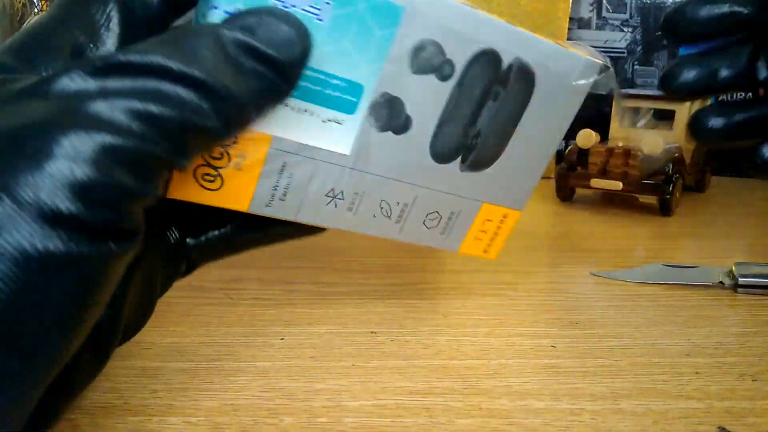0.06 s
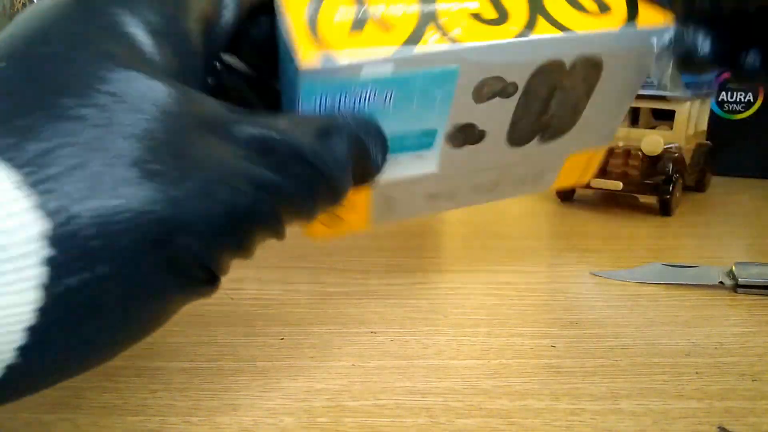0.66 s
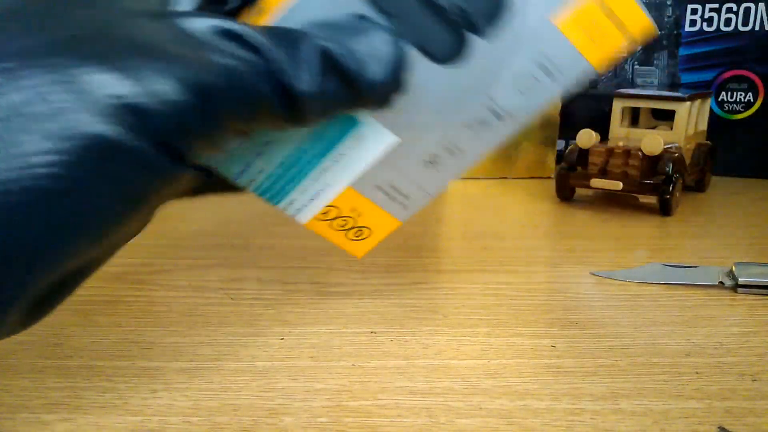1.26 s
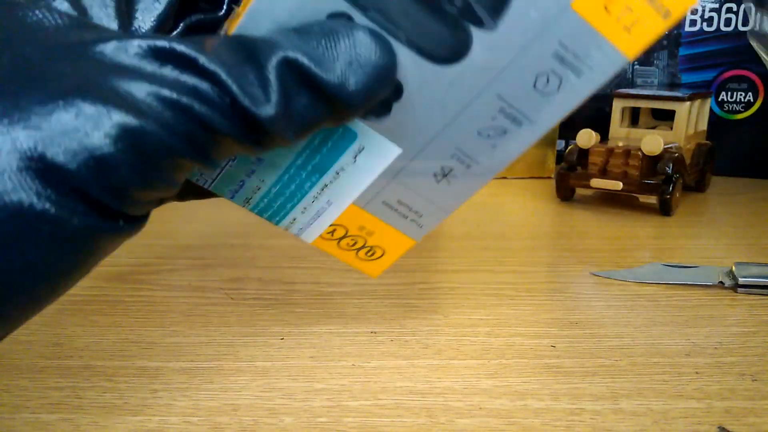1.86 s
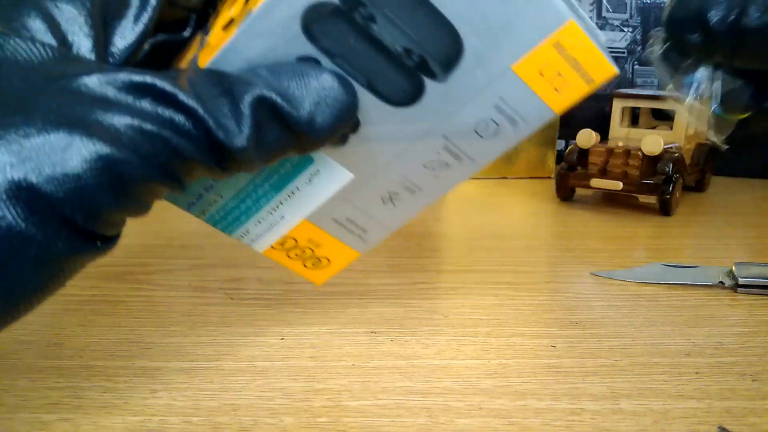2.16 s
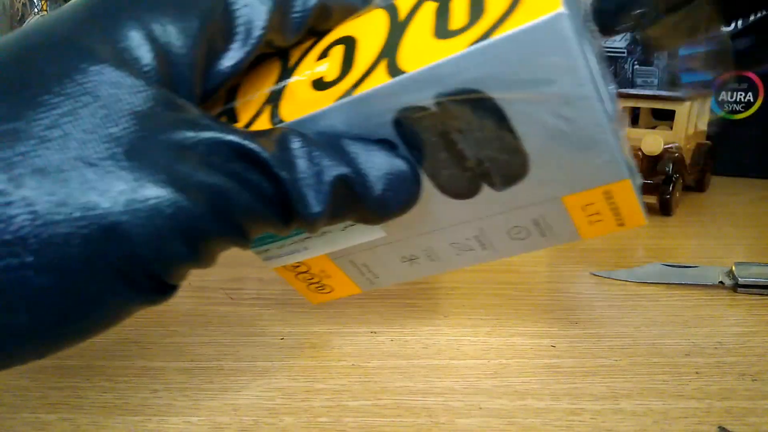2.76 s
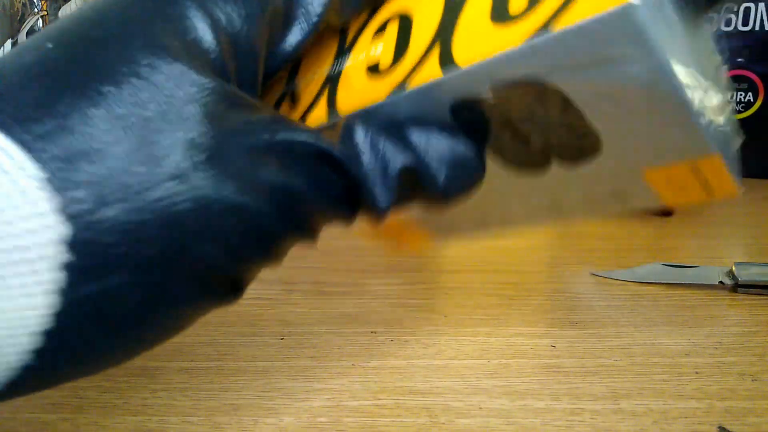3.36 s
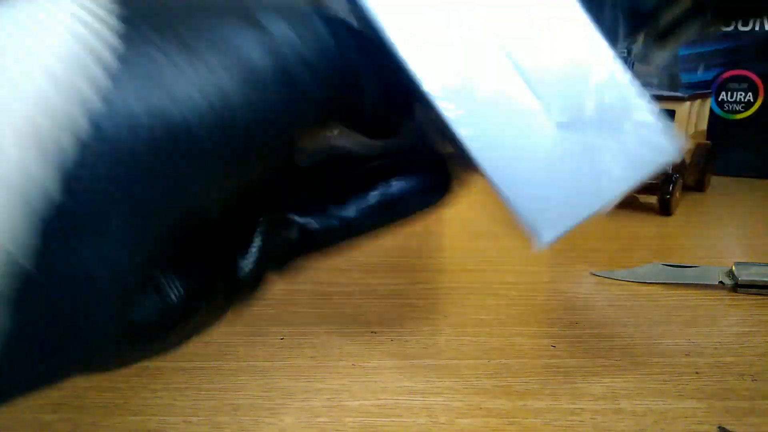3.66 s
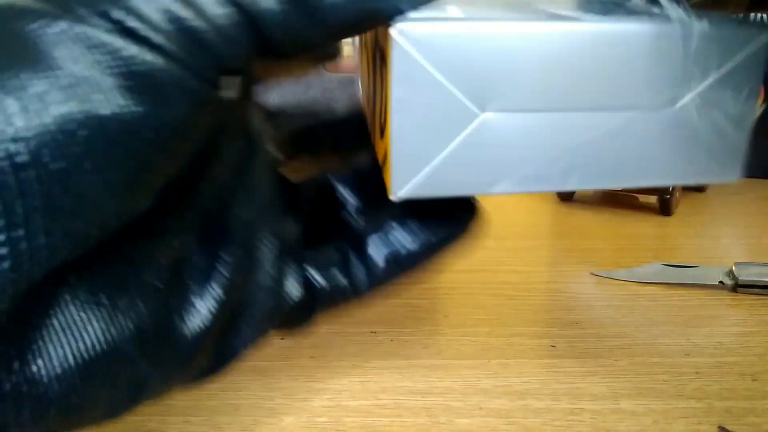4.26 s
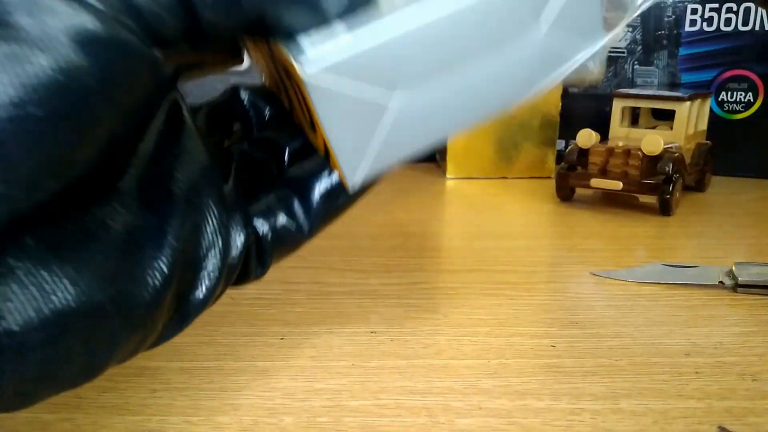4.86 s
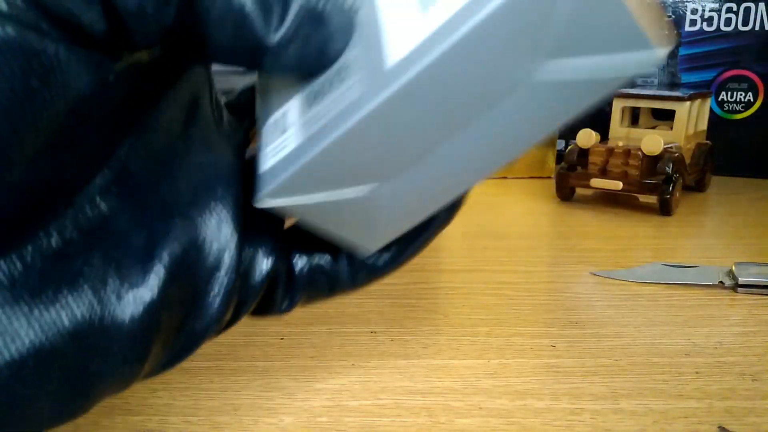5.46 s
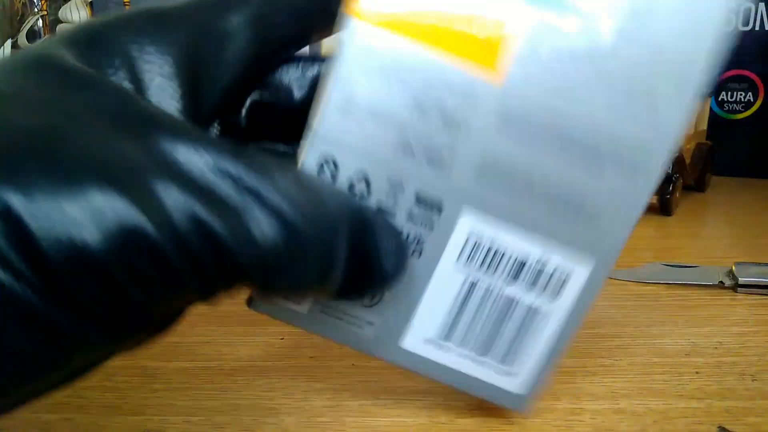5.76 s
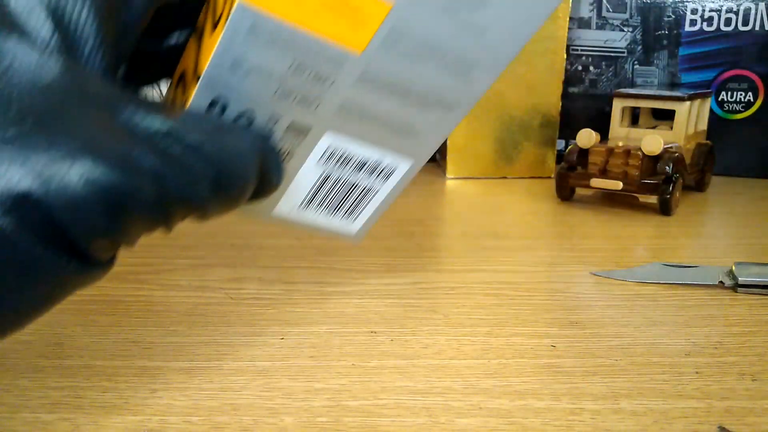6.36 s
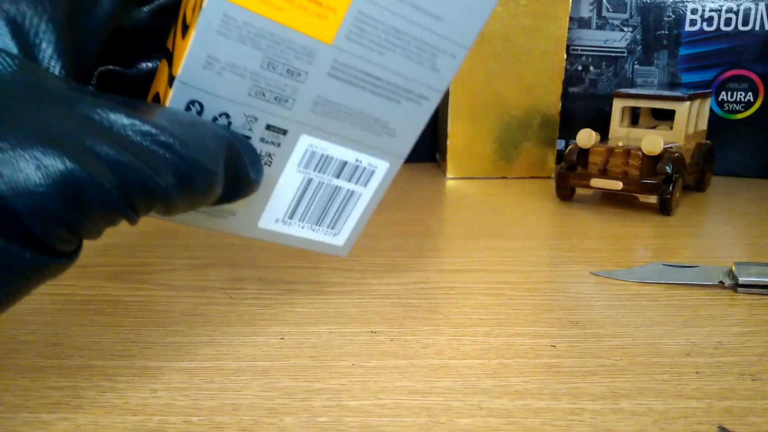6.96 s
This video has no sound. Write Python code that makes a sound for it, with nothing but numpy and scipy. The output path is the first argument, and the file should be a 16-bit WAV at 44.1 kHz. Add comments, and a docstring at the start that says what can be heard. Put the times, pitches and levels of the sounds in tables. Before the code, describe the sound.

Thin plastic film crackles and snaps close up as gloved fingers rub and knock on a small hollow cardboard box.

```python
"""Unwrapping a small cardboard box

Close up, gloved hands turn a small box over a desk and pull off its plastic film. The film crinkles and
snaps as its creases flip. Fingers rub, knock and judder on the card and set the hollow box ringing, and
a rubber fingertip sticks and slips in one rising squeak. A steady electrical hum fills the small room."""
import sys
import numpy as np
from scipy import signal
from scipy.fft import rfft, irfft, next_fast_len
from scipy.io import wavfile

SR = 44100
rng = np.random.default_rng(int(sys.argv[2]) if len(sys.argv) > 2 else 0)


def pcm_store(signal):
    """Save signal as 16-bit PCM."""
    levels = np.round(np.clip(np.atleast_2d(signal), -1, 1) * 32767)
    wavfile.write(sys.argv[1], SR, levels.astype(np.int16).T)


N = 313551
TIME = np.arange(N) / SR

# the bright edge of a crack in the film: freq_hz, gain_db
CRACK_TONE = [(200, -46.5), (1500, -31.5), (3500, -10), (5500, -7.5), (7800, -3), (9500, -3), (12000, -12),
              (16000, -11.5)]
# the midrange body of a crack or a scuff: freq_hz, gain_db
BODY_TONE = [(80, -13.5), (250, -4.5), (900, -2.5), (1600, 0), (3000, 7.5), (5000, 2.5), (9000, -22)]


def film_snaps(flutter_s=.0025, desk_echo_s=.0025, large_db=-14, octaves_per_db=0.1662, size=2048):
    """A crease flips at once, the film flutters for a moment, and the desk returns the crack."""
    # the film buckles: start_s, level_db, body_db (midrange against treble), left_over_right_db
    buckles = [(0.432, -50, -10, -9), (0.5168, -19.5, -17, 2), (0.528, -35, -10, 2), (0.5621, -48, -29, -4),
               (0.6312, -18.5, -17, -1), (0.7902, -11.5, -14.5, -0.5), (0.8237, -7, -17, -1.5),
               (0.9742, -27, -25.5, -2), (1.1708, -28, -38, 2), (1.207, -24, -34, -4),
               (1.255, -19.5, -13.5, -1), (1.373, -25, -17.5, -2), (1.473, -40, -2, 3),
               (1.5238, -11, -12.5, -8), (1.867, -64, 3, -3.5), (2.096, -68, 7.5, 0.5),
               (2.272, -22, -15, 2), (3.4087, -14.5, -24, -1.5), (3.63, -21, -22, -5), (3.644, -25, -16, 0),
               (3.723, -18, -9.5, -2), (3.953, -24.5, -29, -4), (4.1938, -42, -17.5, -6),
               (4.631, -31, -43, -1), (4.646, -23.5, -35, -8.5), (4.704, -26, -23, -4),
               (4.7141, -19.5, -30, -2), (4.7476, -15.5, -21.5, 0), (4.799, -22, -33, 2),
               (4.8593, -22.5, -24.5, -1), (4.9721, -16.5, -14.5, 0.5), (5.1098, -23, -39, 1),
               (5.1394, -14, -15.5, 1.5), (5.1672, -22, -17.5, 4.5), (5.2853, -25, -18, 7),
               (5.2964, -18.5, -12, 3), (5.3073, -14.5, -13, -3), (5.582, -20.5, -21.5, 5),
               (5.6364, -30, -26, 4), (6.171, -23, -11, -1), (6.2013, -23, -12, 0), (6.2505, -23, -17, 1),
               (6.3545, -40, -39, -7), (6.6334, -33, -36.5, 9.5), (6.775, -57.5, -32, 8.5)]
    out, t = np.zeros((2, N)), np.arange(size) / SR
    for start_s, level_db, body_db, side_db in buckles:
        flutter = rng.standard_normal((2, size)) * np.exp(-t / flutter_s)
        flip = gain_of(-1) * spaced_pair(flutter) / np.linalg.norm(flutter[0])
        flip[0, 0] += 1
        flip[1, 1] += 1  # the click reaches the right side one sample later
        add(flip, desk_echo_s, gain_of(-8) * flip)
        octaves_up = octaves_per_db * max(large_db - level_db, 0)  # small creases sound higher
        edge = coloured(flip, np.array(CRACK_TONE) * [2 ** octaves_up, 1])
        crack = gain_of(11) * edge + gain_of(body_db + 16) * coloured(flip, BODY_TONE)
        add(out, start_s + .001, panned(gain_of(level_db) * crack, side_db))
    return out


def handling():
    """Crinkling film, rubbed card and the hollow of the box all follow the hands."""
    # the dry rasp of rubbed card: freq_hz, gain_db
    card_tone = [(150, -29), (400, -15.5), (630, 2.5), (880, -5), (1150, -3.5), (1500, -7), (2100, -3.5),
                 (3000, -10), (5000, -13), (12000, -53.5)]
    # the low voice of the hollow box: freq_hz, gain_db
    hollow_tone = [(40, -32), (110, -5.5), (180, -4.5), (280, 3), (420, -1), (700, -24), (2000, -56.5)]
    film_db, card_db, hollow_db = stroke_levels()
    # the glove catches and lets go in coarse grains, and drags in fine ones
    catch = spaced_pair(grains(per_s=400, spread_db=4.5, clump_db=1.5, clumps_per_s=55))
    drag = spaced_pair(grains(per_s=1400, spread_db=1.5, clump_db=4.0, clumps_per_s=70))
    crackle = gain_of(-11.5) * coloured(gain_of(film_db) * catch, CRACK_TONE)
    film = crinkling(film_db) + crackle + small_snaps(film_db)
    rub = gain_of(card_db) * (0.78 * drag + 0.49 * catch)
    ring = gain_of(-18.5) * signal.oaconvolve(rub, box_ring()[None], axes=1)[:, :N]
    hollow = gain_of(-2.5) * coloured(gain_of(hollow_db) * drag, hollow_tone)
    return follow_box(film + coloured(rub, card_tone) + ring + hollow)


def stroke_levels(swell_share=0.33, sag_db_per_s=15, rest_db=-97, hop=44):
    """Film, card and hollow levels in dB: each stroke swells, sags as the glove slides, then dies away."""
    # a hand slides or shifts its grip: start_s, length_s, film_db, card_db, hollow_db
    strokes = [(0.0, .12, -45.5, -48, -73.5), (0.283, 0.16, -68.5, -60, -73),
               (0.42, 0.017, -47, -47.5, -50.5), (0.444, 0.037, -49, -57, -56),
               (0.506, 0.038, -42.5, -47.5, -50), (0.553, 0.24, -55.5, -66, -64.5),
               (0.815, 0.012, -41, -49.5, -58), (0.889, 0.15, -59, -65, -70),
               (1.092, 0.035, -54.5, -55.5, -57.5), (1.201, 0.042, -44.5, -51, -55),
               (1.248, 0.064, -35, -35, -54), (1.343, 0.12, -51.5, -52.5, -60.5),
               (1.516, 0.012, -34.5, -43.5, -54), (1.645, 0.034, -59.5, -65, -88),
               (2.223, 0.065, -48.5, -58, -82), (2.248, 0.034, -42.5, -46.5, -79),
               (2.446, 0.13, -56.5, -65.5, -86), (2.575, 0.077, -51.5, -66, -77),
               (2.846, 0.14, -61.5, -64.5, -77), (2.937, 0.049, -50.5, -52, -63.5),
               (2.988, 0.038, -44, -51.5, -62), (3.12, 0.057, -51, -52, -58), (3.229, 0.032, -50, -44, -51),
               (3.275, 0.028, -35.5, -36.5, -68), (3.318, 0.075, -37.5, -42, -70),
               (3.387, 0.064, -44, -38, -61), (3.542, 0.12, -50.5, -51.5, -66),
               (3.708, 0.028, -35.5, -33, -75), (3.741, 0.14, -47, -46.5, -51.5),
               (3.982, 0.064, -50, -48, -51), (4.173, 0.15, -63.5, -65, -74),
               (4.349, 0.12, -54, -51, -54.5), (4.438, 0.063, -41.5, -44.5, -42),
               (4.696, 0.11, -42, -45, -49.5), (4.855, 0.081, -48, -62, -69),
               (4.952, 0.02, -38.5, -54, -51), (5.114, 0.076, -50, -57.5, -58.5),
               (5.281, 0.021, -36, -37, -40.5), (5.419, 0.057, -53, -61.5, -76),
               (5.472, 0.12, -40, -47, -63), (5.62, 0.032, -43.5, -51, -60.5), (5.653, 0.19, -43, -43, -69),
               (5.787, 0.06, -48.5, -44.5, -45), (5.848, 0.048, -52.5, -49, -68),
               (6.016, 0.14, -41, -52.5, -66.5), (6.104, 0.053, -36, -45, -72),
               (6.194, 0.011, -36, -45.5, -65), (6.154, 0.028, -40, -38, -43.5),
               (6.239, 0.02, -34.5, -40.5, -53.5), (6.429, 0.037, -51, -93, -86.5),
               (6.466, 0.068, -58, -79.5, -77), (6.611, 0.04, -68.5, -78, -84.5),
               (6.752, 0.039, -69.5, -86, -89), (6.874, .035, -76, -91.5, -90)]
    # the fade after a stroke: film_db_per_s, card_db_per_s, hollow_db_per_s
    release_rates = [262.5, 286, 337]
    clock = TIME[::hop]
    power = np.full((3, len(clock)), gain_of(rest_db) ** 2)  # the hands are never quite still
    for start_s, length_s, *levels_db in strokes:
        t = np.maximum(clock - start_s, 0)
        swell = np.minimum(t / (swell_share * length_s), 1)
        fall_db = sag_db_per_s * t + np.outer(release_rates, np.maximum(t - length_s, 0))
        power += (swell * gain_of(np.array(levels_db)[:, None] - fall_db)) ** 2
    return [np.interp(TIME, clock, 10 * np.log10(layer)) for layer in power]


def crinkling(film_db, firm_db=-40, hiss_share=.4):
    """Each size of crease crackles on its own; a firm grip brings out the large ones."""
    # creases, large to small: pitch_hz, sharpness_q, level_db, growth (extra dB per dB of film level)
    creases = [(3600, 3.2, -8.5, 0.44), (6240, 2.1, -4, 0.34), (8440, 2.6, -1, -0.08),
               (12160, 1.6, -12.5, -0.3)]
    out = np.zeros((2, N))
    for pitch_hz, q, level_db, growth in creases:
        slips = grains(per_s=1200, spread_db=3.0, clump_db=4.0, clumps_per_s=100)
        slips += hiss_share * rng.standard_normal((2, N))
        ring = unit_rms(resonate(slips, pitch_hz, q))
        out += ring * gain_of(level_db + film_db + growth * (film_db - firm_db))
    return low_cut(out, hz=2200)


def small_snaps(film_db, ceiling_db=-53):
    """Little creases flip at random as the film moves; past a light grip they get no louder."""
    flips = grains(per_s=42, spread_db=2.6, clump_db=2.5, clumps_per_s=12)
    return gain_of(-5) * coloured(flips * gain_of(np.minimum(film_db, ceiling_db)), CRACK_TONE)


def finger_knocks(panel_decay_s=0.0029, scuff_decay_s=0.0011):
    """A soft fingertip drives one panel for a few cycles and leaves the whole box ringing."""
    # fingers land or slip on the box: start_s, level_db, pitch_hz
    landings = [(0.43, -29, 860), (0.516, -24, 590), (0.822, -26.5, 1100), (1.115, -31, 904),
                (1.34, -23.5, 670), (1.472, -32, 696), (1.867, -57, 990), (2.094, -56.5, 1020),
                (3.408, -24.5, 652), (3.722, -13.5, 590), (3.74, -28, 684), (3.861, -25.5, 590),
                (3.876, -29, 563), (4.007, -33, 580), (4.383, -32, 285), (4.453, -31, 503),
                (4.494, -24.5, 626), (4.526, -30.5, 326), (4.717, -34, 390), (4.969, -31, 610),
                (5.294, -30, 745), (5.307, -30, 780), (6.179, -24.5, 660), (6.248, -29.5, 620)]
    out, ring = np.zeros((2, N)), box_ring()
    t = np.arange(len(ring)) / SR
    for start_s, level_db, pitch_hz in landings:
        panel = np.sin(2 * np.pi * pitch_hz * t) * np.exp(-t / panel_decay_s)
        scuff = spaced_pair(rng.standard_normal((2, len(t)))) * np.exp(-t / scuff_decay_s)
        knock = panel + gain_of(7) * ring + gain_of(-6) * coloured(scuff, BODY_TONE)
        add(out, start_s + .003, gain_of(level_db - 3.5) * knock)
    return follow_box(low_cut(out, hz=190))  # the knocks carry no deep bass


def box_ring(size=6000):
    """The cardboard box answers one tap with quickly dying modes, scaled to unit energy."""
    # modes of the box: pitch_hz, level_db, t60_s
    box_modes = [(242.4, -15.5, .08), (259, -8.5, 0.12), (357, -14.5, 0.076), (496, -16.5, .05),
                 (630, 2.5, 0.028), (637.7, 3, 0.14), (698, -11, 0.057), (817.5, -6, 0.081),
                 (1047, 3, 0.053), (1216, -0.5, 0.058), (1315, -4.5, 0.053), (1819, -15, 0.021),
                 (2340, -4.5, 0.055)]
    t = np.arange(size) / SR
    ring = sum((-1) ** k * gain_of(level_db - 60 * t / t60_s) * np.sin(2 * np.pi * pitch_hz * t)
               for k, (pitch_hz, level_db, t60_s) in enumerate(box_modes))
    return ring / np.linalg.norm(ring)


def panel_scrapes():
    """Bursts of uneven slips ring one panel of the box; the grip sets its pitch."""
    # a glove or an edge judders over a panel: start_s, length_s, level_db, pitch_hz
    judders = [(0.01, 0.12, -52.5, 1930), (0.634, 0.052, -56.5, 597), (0.697, 0.069, -54.5, 650),
               (1.271, 0.12, -47, 1120), (1.285, 0.051, -40, 653), (3.107, 0.089, -50, 682),
               (3.337, 0.058, -43.5, 3700), (3.435, 0.027, -45, 3280), (3.438, 0.018, -53, 942),
               (4.45, 0.099, -46, 570), (4.474, 0.058, -47, 334), (4.669, 0.093, -57.5, 384),
               (4.745, 0.11, -53.5, 254), (5.474, 0.1, -51.5, 2010), (5.71, 0.21, -55, 552),
               (6.088, 0.034, -44, 3630), (6.124, 0.048, -39, 3850), (6.193, 0.022, -36.5, 3780)]
    out = np.zeros((2, N))
    slips = spaced_pair(grains(per_s=760, spread_db=2.5, clump_db=0.0, clumps_per_s=130))
    for start_s, length_s, level_db, pitch_hz in judders:
        burst = slips[:, round(start_s * SR):][:, :round(length_s * SR)]
        burst = burst * signal.windows.tukey(burst.shape[1], .5)
        burst = np.pad(burst, ((0, 0), (0, 1000)))  # time to ring out
        ring = resonate(resonate(burst, pitch_hz, q=7), pitch_hz, q=1)
        add(out, start_s, gain_of(level_db) * unit_rms(ring))
    return follow_box(out)


def rubber_squeak(jitter=.07, shimmer_db=1.5, harmonics=6):
    """Stick-slip cycles climb as the finger speeds up; their overtones sweep the panel's resonances."""
    # rubber sticks and slips on the film: time_s, pitch_hz, level_db
    glide = [(3.272, 540.4, -52.5), (3.288, 652, -33), (3.298, 513.4, -45.5), (3.329, 569.6, -35.5),
             (3.35, 626, -35.5), (3.369, 730, -30.5), (3.377, 883, -41), (3.393, 1215, -32.5),
             (3.406, 1280, -51.5)]
    # the panel under the fingertip: freq_hz, gain_db
    panel_tone = [(650, -2), (900, 0), (1200, -3.5), (1500, -15.5), (3600, -20), (6000, -29)]
    time_s, pitch_hz, level_db = np.transpose(glide)
    pitch = np.interp(TIME, time_s, pitch_hz)
    cycles = np.cumsum(pitch * (1 + jitter * wander(400))) / SR
    tone = sum(gain_of(curve_at(panel_tone, k * pitch)) * np.sin(2 * np.pi * k * cycles)
               for k in range(1, harmonics + 1))
    envelope = gain_of(np.interp(TIME, time_s, level_db) + shimmer_db * wander(200))
    sliding = (TIME > time_s[0]) & (TIME < time_s[-1])
    return np.sqrt(2) * tone * envelope * sliding


def near_echoes(x, sway=.2):
    """Glove, desk and backdrop return the rustle; drifting delays shift its colour as the box turns."""
    out = x.copy()
    for delay_s, share in [(.0009, .35), (.0025, .4), (.0052, .35)]:
        source_s = TIME - delay_s * (1 + sway * wander(3))
        out += share * x[:, np.clip(np.round(source_s * SR).astype(int), 0, N - 1)]
    return out


def small_room(x, fade_in_s=0.004, size=22050):
    """Dense reflections from desk and walls, each band dying at its own speed."""
    # the room's decay: freq_hz, t60_s
    decay_times = [(150, .3), (600, 0.24), (2000, 0.22), (8000, 0.22), (16000, 0.24)]
    reflections = rng.standard_normal((2, size)) * (rng.random((2, size)) < .2)
    hz, t, bands = signal.stft(spaced_pair(reflections), SR, nperseg=256)
    decay = gain_of(-60 * t / curve_at(decay_times, hz)[:, None])
    _, tail = signal.istft(bands * decay, SR, nperseg=256)
    tail *= np.clip(np.arange(tail.shape[1]) / SR / fade_in_s - .5, 0, 1)  # opens after a short gap
    return signal.fftconvolve(x, tail / np.linalg.norm(tail[0]), axes=1)[:, :N]


def room_tone():
    """Electrical hum over a faint hiss and a wide, low rumble."""
    # partials of the hum: pitch_hz, level_db
    partials = [(75, -84.5), (99.4, -62.5), (198.8, -89), (298.2, -91.5), (497, -100.5)]
    # the colour of the noise bed: freq_hz, gain_db
    hiss_tone = [(20, -4), (60, 9.5), (130, 5.5), (300, -24), (700, -21), (2000, -15.5), (6000, -16.5),
                 (10000, -27), (12500, -27), (16000, -30.5)]
    hum = sum(gain_of(level_db) * np.sqrt(2) * np.sin(2 * np.pi * (pitch_hz * TIME + rng.random()))
              for pitch_hz, level_db in partials)
    hiss = coloured(spaced_pair(rng.standard_normal((2, N))), hiss_tone)
    rumble = coloured(rng.standard_normal((2, N)), [(30, -3), (120, -11), (500, -35.0)])
    hum *= gain_of(0.38 * wander(6.5))  # the level wavers slightly
    return panned(hum, side_db=-1) + gain_of(-77.0) * hiss + gain_of(-99.5) * rumble


def grains(per_s, spread_db, clump_db, clumps_per_s):
    """Tiny slips of very unequal size that come in clumps, each from its own direction."""
    chance, luck, bearing = rng.random((3, N), dtype=np.float32)
    hits = np.flatnonzero(chance < per_s / SR)
    strength = np.minimum(-np.log(1 - luck[hits]), 4)
    size = gain_of(spread_db * strength + clump_db * wander(clumps_per_s)[hits])
    angle = 2 * np.pi * bearing[hits]
    train = np.zeros((2, N))
    train[:, hits] = size * np.array([np.cos(angle), np.sin(angle)])
    return unit_rms(train)


def spaced_pair(x):
    """Blends two noises as spaced microphones hear them: alike in the mids, different in the treble."""
    # likeness of left and right: freq_hz, correlation
    likeness = [(100, 0.39), (600, 0.85), (1200, 0.79), (2200, 0.22), (5000, 0.08), (9000, 0.15),
                (16000, 0.15)]
    size = next_fast_len(x.shape[1])
    mid, side = rfft(x, size)
    angle = np.arccos(curve_at(likeness, np.fft.rfftfreq(size, 1 / SR))) / 2
    mid, side = mid * np.cos(angle), side * np.sin(angle)
    return irfft([mid + side, mid - side], size)[:, :x.shape[1]]


def follow_box(x):
    """Pans a sound with the box as it moves in the hands."""
    # where the box sits: time_s, left_over_right_db
    box_path = [(0, 0.5), (2.5, 1), (3.7, -1), (4.4, -3), (4.8, -2), (5.2, 0.5), (5.8, -0.5), (6.3, 0.5),
                (7, 4)]
    return panned(x, np.interp(TIME, *np.transpose(box_path)))


def panned(x, side_db):
    """Tilts the level between the sides; positive is left."""
    return x * gain_of(np.array([[.5], [-.5]]) * side_db)


def coloured(x, tone, size=2048):
    """Shapes a sound with a causal, unit-energy filter drawn through (freq_hz, gain_db) points."""
    log_gain = np.log(gain_of(curve_at(tone, abs(np.fft.fftfreq(size, 1 / SR)))))
    taps = np.fft.ifft(np.exp(np.conj(signal.hilbert(log_gain)))).real
    return signal.oaconvolve(x, taps[None] / np.linalg.norm(taps), axes=1)[:, :x.shape[1]]


def resonate(x, hz, q):
    """Rings one resonance."""
    return signal.lfilter(*signal.iirpeak(hz, q, SR), x)


def low_cut(x, hz):
    """Rolls off the lows at 12 dB an octave."""
    return signal.sosfilt(signal.butter(2, hz, "high", fs=SR, output="sos"), x)


def wander(per_s):
    """A random drift with an rms of one."""
    knots = np.arange(0, N / SR + 1, 1 / per_s)
    values = np.resize(rng.standard_normal(4096), len(knots))
    return unit_rms(np.interp(TIME, knots, values))


def curve_at(points, hz):
    """Reads a curve on a log-frequency axis."""
    freq_hz, value = np.transpose(points)
    return np.interp(np.log(hz + 1), np.log(freq_hz + 1), value)


def add(mix, start_s, sound):
    """Lays a sound into both channels."""
    part = mix[:, round(start_s * SR):][:, :sound.shape[-1]]
    part += sound[..., :part.shape[1]]


def gain_of(db):
    """Decibels to amplitude."""
    return 10 ** (np.asarray(db) / 20)


def unit_rms(x):
    """Scales to an rms of one."""
    return x / np.sqrt(np.mean(x ** 2) + 1e-20)


def scene():
    """Film and box close by, with the room behind them."""
    cracks = film_snaps()
    hands = gain_of(-1.6) * near_echoes(handling()) + panel_scrapes() + finger_knocks() + rubber_squeak()
    hands[0] = np.roll(hands[0], 3)  # the box is a little nearer the right, so the left hears it later
    reverb = small_room(gain_of(-13.0) * cracks + gain_of(-18.5) * hands)
    return cracks + hands + reverb + room_tone()


def record(dry, cutoff_hz=16100):
    """A steep low-pass trims the very top of the treble."""
    taps = signal.firwin(255, cutoff_hz, window=("kaiser", 8), fs=SR)
    return signal.oaconvolve(dry, taps[None], "same")


dry = scene()
out = record(dry)
pcm_store(out)
```